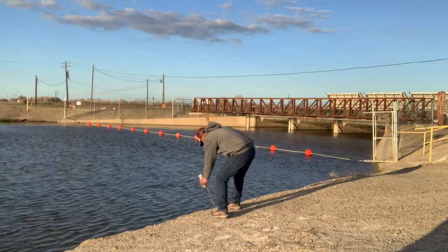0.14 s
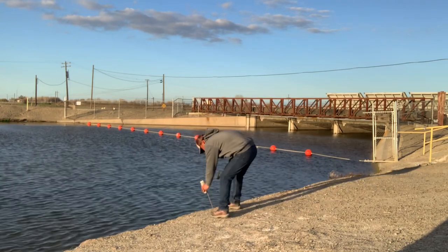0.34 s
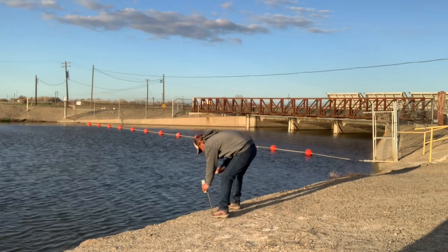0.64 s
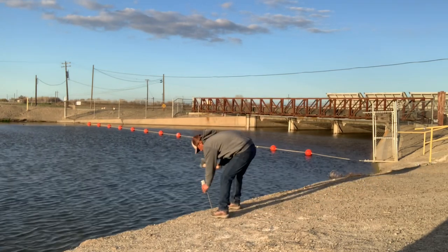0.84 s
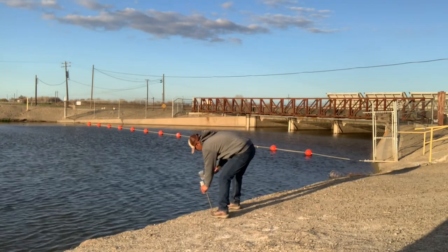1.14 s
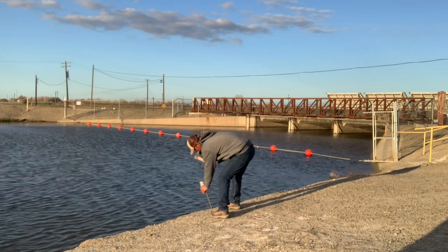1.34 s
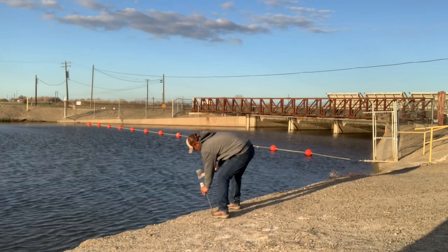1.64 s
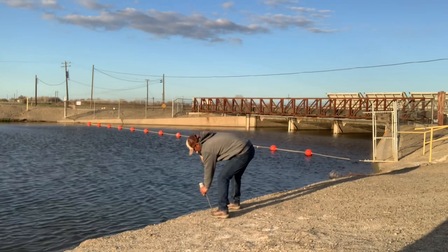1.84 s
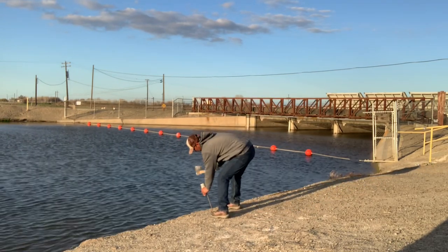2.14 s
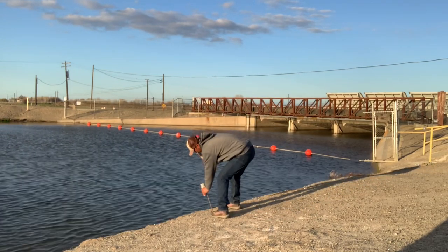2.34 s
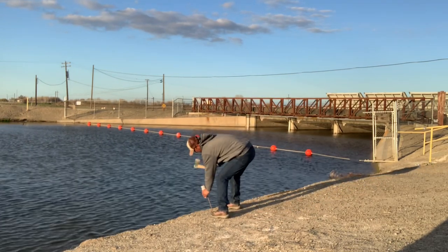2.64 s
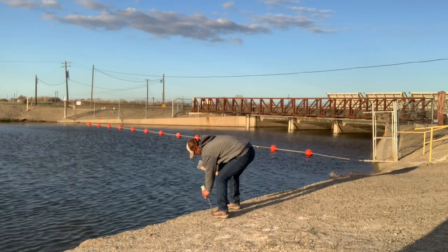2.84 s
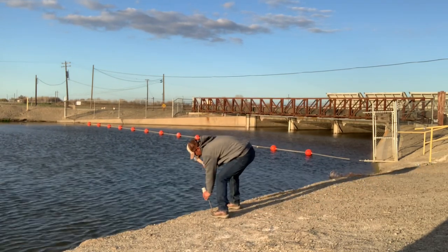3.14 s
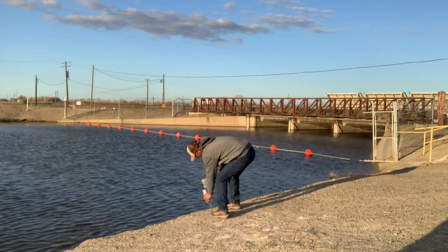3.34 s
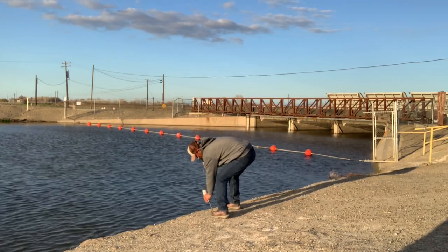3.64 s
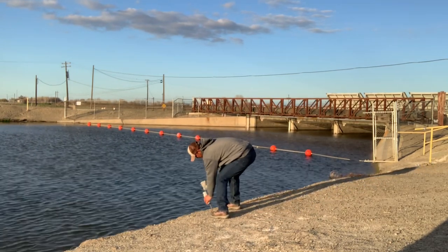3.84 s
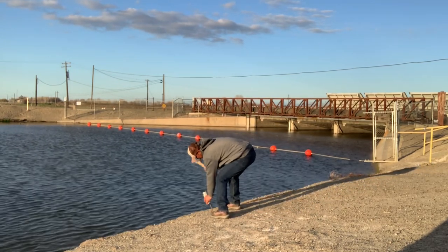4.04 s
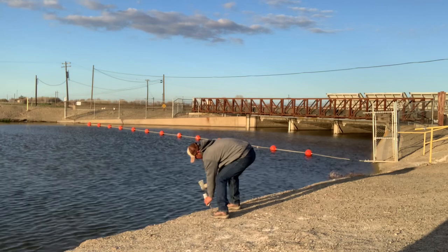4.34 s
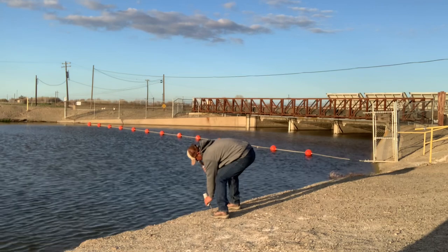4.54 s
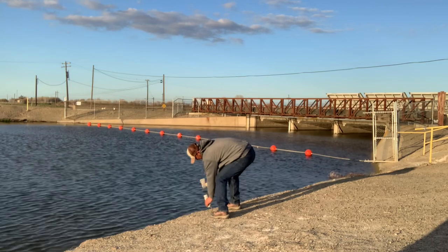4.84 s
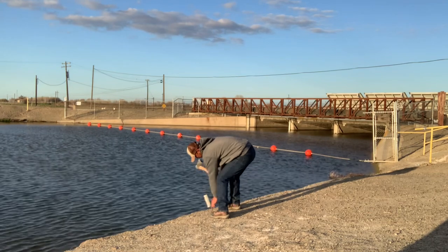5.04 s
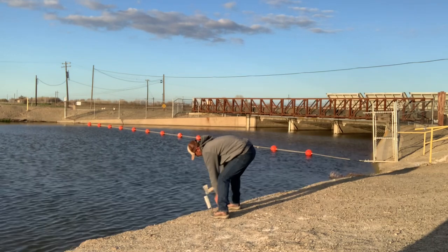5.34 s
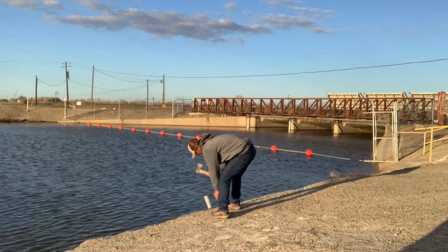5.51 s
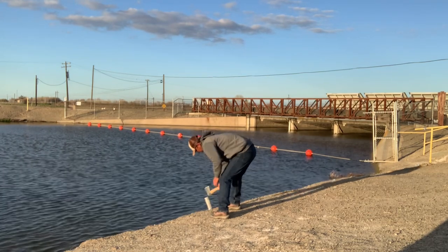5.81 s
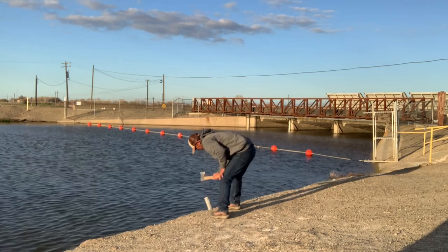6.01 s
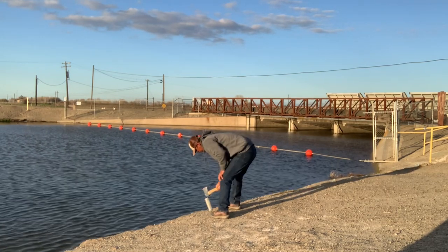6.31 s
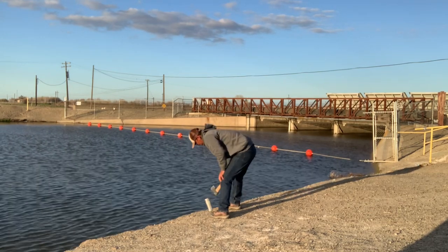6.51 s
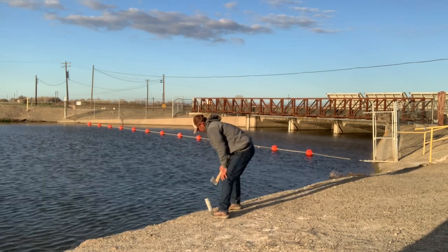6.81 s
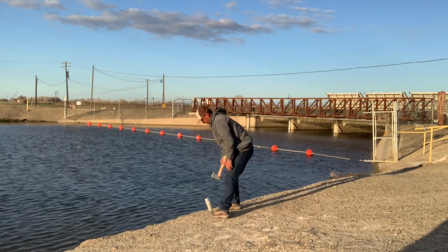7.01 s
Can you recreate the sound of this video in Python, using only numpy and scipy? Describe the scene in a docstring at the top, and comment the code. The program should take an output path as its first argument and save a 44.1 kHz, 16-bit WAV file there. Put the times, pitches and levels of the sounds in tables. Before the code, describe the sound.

Outdoors on a gravel bank by open water, small birds twitter and boots crunch faintly. After a second, a steel hammer starts hitting a wooden stake: twelve hard, bright cracks, slightly under half a second apart, slower at the end. Each has a short clicky ring and a faint scattered echo. Wind is mild at first, then thumps and pops on the nearby stereo microphone in the second half.

```python
"""A steel hammer drives a wooden stake into a gravel bank beside open water, metres from a two-port microphone.
Each blow is a noise crack plus ringing modes and a low thump, with a ground echo, bright slaps and scattered
noise returns from the near bank and from a bridge across the water.
Wind is banded noise with buffets, pops and ticks on the ports; small birds are gliding sines that also
return from the surroundings; boots crunch as noise grains; a faint open-air hiss lies under it all."""
import sys
import numpy as np
from scipy import signal
from scipy.fft import rfft, irfft
from scipy.io import wavfile
from scipy.ndimage import uniform_filter1d

SR = 44100
rng = np.random.default_rng(int(sys.argv[2]) if len(sys.argv) > 2 else 0)


def dump(signal):
    """Clip the signal to [-1, 1] and save it as 16-bit WAV at the path in sys.argv[1]."""
    limited = np.clip(np.atleast_2d(signal).T, -1, 1)
    pcm = np.round(limited * 32767).astype(np.int16)
    wavfile.write(sys.argv[1], SR, pcm)


N = 316175   # length [samples]

# Wind between the buffets: (time [s], relative level [dB], offset of the rasp above it [dB])
WIND = [(0, -27.5, -17), (.9, -32, -18), (1.4, -34, -13.5), (1.6, -39, -14), (2.1, -37, -15.5),
        (3.1, -36.5, -13.5), (3.5, -29, -9), (3.78, -34.5, -7), (3.95, -23, -6.5), (4.25, -37.5, -14.5),
        (4.5, -29, -6), (4.721, -33, -12), (5.001, -23.5, -9), (5.2, -32.5, -12), (5.8, -31.5, -7),
        (6.151, -32, -16), (6.45, -24.5, -10.5), (6.8, -31, -15), (7.17, -35, -19)]
# Wind spectrum: (frequency [Hz], relative density [dB per Hz], share of the rasp offset, flicker [dB])
WIND_BANDS = [(22.7, -19.5, .02, 3), (36.25, 1.5, .02, 2.5), (68, 10.5, 0.022, 1.5), (108, 6, .22, 4.5),
              (160.5, 5, .8, 5.5), (338, 0.5, 1.553, 6.5), (452, -7, 1.81, 5), (640, -14.5, 2.1, 7),
              (1380, -33.5, 2.15, 5)]
# Buffets, single thumps of air on the ports: (middle [s], length [s], relative level [dB])
BUFFETS = [(0.274, 0.02, -19.5), (0.772, 0.05, -24), (0.864, 0.075, -25), (2.598, 0.08, -35),
           (3.38, 0.13, -26.5), (3.547, 0.06, -23.5), (3.884, 0.055, -11), (4.434, 0.055, -19.5),
           (4.6, 0.048, -17), (4.959, 0.042, -18), (5.348, 0.025, -16), (5.447, 0.15, -21.5),
           (5.64, 0.13, -17), (5.814, 0.052, -24), (5.916, 0.11, -24.5), (6.083, 0.014, -19.5),
           (6.584, 0.119, -25.5), (6.706, 0.057, -17)]
RASP_PER_BUFFET_DB = 0.188   # dB of rasp for each dB a buffet stands above the wind
# Eddies reach the left port late; from a moment on, the lows sit in the middle
EDDY_LAG_S, CENTRED_FROM_S, CENTRED_BELOW_HZ = .0019, 5.08, 700
WIND_LIKENESS, RASP_LIKENESS = 0.63, 0.19   # left-right, in bands below and above the centred lows
# Open-air hiss: (frequency [Hz], relative density [dB per Hz])
AIR_SPECTRUM = [(700, 0), (1500, -3), (3000, -0.5), (5000, -8), (7500, -17.5), (9000, -27.5),
                (13000, -15.5), (16500, -22.5)]
AIR_DB = -68
# Bird notes: (time [s], length [s], start [Hz], end [Hz], arch on the glide [Hz], level [dB])
BIRD_NOTES = [(0.016, 0.022, 3850, 3450, 100, -57), (0.044, 0.055, 4200, 3850, 351, -53.5),
              (0.055, 0.03, 2420, 1950, 1, -60), (0.085, 0.045, 2100, 2100, 643, -68.5),
              (0.23, 0.05, 4260, 3800, 394.5, -55.5), (0.338, 0.065, 3050, 2600, 1091, -55.5),
              (0.404, 0.028, 3020, 3410.0, 94, -51), (0.44, 0.025, 3460, 3400, 546.5, -49),
              (0.52, 0.025, 3630, 3500, 407.5, -55.5), (0.57, 0.05, 3550, 3640.0, -110.0, -52.0),
              (0.604, 0.037, 4400.0, 4440.0, -160.0, -50), (0.668, 0.058, 3910, 3200, 492, -52.5),
              (0.74, 0.022, 3900, 3600, 100, -60), (0.77, 0.03, 2980, 2500, -2, -61),
              (0.778, 0.041, 4380, 3850.0, 194.5, -50), (0.822, 0.022, 3650, 3600, 901, -54),
              (0.845, 0.025, 2320, 2500, 201, -62), (0.86, 0.06, 4380, 3350, 505.5, -57.5),
              (0.95, 0.05, 3250, 2300, 301.5, -64.5), (1.236, 0.061, 3610, 3770.0, 20.0, -55),
              (1.265, 0.025, 3800, 3900, 698, -57.5), (1.284, 0.019, 3450.0, 3040.0, 69.5, -55),
              (1.324, 0.058, 3450, 3550, 150, -55.5), (1.363, 0.029, 3980.0, 4360.0, 247.5, -50.5),
              (1.638, 0.064, 2330.0, 2530.0, 396, -59.5), (1.782, 0.043, 4050.0, 3580.0, 281.5, -55.5),
              (1.824, 0.022, 4170.0, 4160.0, -3.5, -55.5), (2.3, 0.025, 3570, 4700, 201, -62.5),
              (2.316, 0.023, 3490.0, 3540.0, 126, -52), (2.443, 0.042, 3760, 3500, 697, -51),
              (2.535, 0.048, 4000, 3500, 648.5, -58), (2.595, 0.012, 3620, 4000, 803.5, -57),
              (2.616, 0.026, 4180, 4490.0, -120.0, -50), (2.648, 0.034, 4000, 3430.0, 58.5, -53.5),
              (2.695, 0.025, 4130, 3500, 100.5, -60), (2.756, 0.038, 3480, 3860.0, 170.0, -54),
              (2.793, 0.025, 4800, 3000, 4.5, -55.5), (2.999, 0.035, 3490.0, 3590.0, -63, -56.5),
              (3.035, 0.037, 3810, 4030.0, 204.5, -51), (3.09, 0.041, 3900, 3280.0, 281, -49.5),
              (3.193, 0.044, 3560, 3530.0, 66, -51.5), (3.346, 0.04, 4180.0, 3780.0, -170.0, -54.5),
              (3.454, 0.037, 2696, 2210.0, 92, -56.5), (3.654, 0.046, 3020, 2520.0, 123, -54),
              (3.837, 0.028, 2950.0, 2480.0, -25, -53), (3.922, 0.019, 2470, 2890.0, 69.5, -52),
              (3.976, 0.046, 3370, 3560.0, 143, -45), (4.027, 0.035, 2920.0, 2130.0, 92, -50),
              (4.293, 0.032, 4040.0, 3500.0, -160.0, -54.5), (4.365, 0.025, 3950.0, 3670.0, 56, -56.0),
              (4.376, 0.034, 4080.0, 4270.0, 216.5, -52.5), (4.56, 0.03, 4270, 3900, 800, -58),
              (4.587, 0.022, 2300, 2540.0, 32.5, -56), (4.93, 0.056, 3780, 4350, -120, -51.5),
              (5.008, 0.02, 3560, 3700, 697.5, -51), (5.127, 0.032, 3840, 3760.0, -61, -52.0),
              (5.163, 0.019, 4210.0, 4080.0, 223, -48.5), (5.336, 0.043, 3750, 3600, 239, -50.5),
              (5.501, 0.08, 2300, 2350, 499, -59), (5.62, 0.036, 3880, 3670, 299, -56),
              (5.805, 0.032, 2810, 2350, 75, -61), (5.85, 0.018, 3610, 3800, 548, -50.5),
              (5.87, 0.04, 3870, 4100, 4.5, -53.5), (5.942, 0.018, 3500, 3600, 848, -48),
              (5.955, 0.045, 3450, 3200, 449.5, -52), (5.995, 0.035, 2720, 2400, 148.5, -60),
              (6.05, 0.045, 4020, 3450, 9, -62.5), (6.105, 0.02, 3720, 3500, 250.5, -59),
              (6.155, 0.06, 3470, 2000, 499.5, -63), (6.203, 0.022, 3300, 3450, 246.5, -52.5),
              (6.362, 0.043, 3820.0, 4040.0, 233, -53), (6.426, 0.026, 3320.0, 3830.0, 113, -55),
              (6.47, 0.025, 3700, 3600, 995, -53), (6.497, 0.014, 3460, 4400, 3, -53.5)]
FAR_BIRDS_PER_S, FAR_BIRDS_DB, FAR_BIRDS_UNTIL_S = 70, -62, 6.6   # level of the loudest
# Boots on gravel: (time [s], relative level [dB], t60 [s], frequency that places the band [Hz])
STEPS = [(0.057, -53, 0.051, 5350), (0.254, -42, 0.044, 2050), (.718, -56, 0.037, 5500),
         (.825, -64, .04, 5190), (6.69, -42, 0.033, 1620), (6.927, -51.5, 0.08, 2640),
         (6.986, -51.5, 0.042, 4370)]
# Sudden pressure steps of eddies on the ports: (time [s], relative level [dB])
POPS = [(.601, -32.5), (3.497, -22), (3.846, -32.5), (3.889, -19), (4.425, -26.5), (4.518, -24.5),
        (4.837, -22), (4.898, -27.5), (4.944, -23), (4.978, -30.5), (5.265, -18.5), (5.333, -15.5),
        (5.455, -24), (5.597, -29.5), (5.624, -16), (5.669, -23), (5.806, -14), (5.912, -24.5),
        (6.006, -29.5), (6.373, -28), (6.428, -26.5), (6.485, -32.5), (6.698, -25)]
POP_HZ, POP_END_HZ, POP_FALL_S = 401.5, 95, 0.01   # glide scale and noise top, end pitch, time constant
POP_T60_S, POP_THUMP_DB, POP_RISE_S = .08, 4.5, 0.0056

# Blows; where the face lands sets how each part rings, in groups numbered without pitch order:
# (time [s], blow level [dB], wood [dB], ring group 1 [dB], ring group 2 [dB], ring group 3 [dB],
#  ring group 4 [dB], low thump at the moment of the blow, from ground or wind, independent of the
#  blow level [dB], ground echo delay [ms], ground echo level [dB])
BLOWS = [(1.018, -5.5, 4, -9.5, -5, -21, 1.5, -16, 4, -3.5),
         (1.467, -5, 2, 1.5, -21.5, -17, 0.5, -24.5, 3, -2),
         (1.499, -25.5, 4.5, 1.5, -7, -9, -9, -41.5, 4, -5.5),
         (1.938, -3, -2.5, 1, -6.5, -6.5, 2, -26.5, 3.5, -3),
         (2.3832, -5, 4.5, -12.5, 6.5, -1.5, -0.5, -19, 6.7, -5.5),
         (2.8228, -4.5, -2, -14, 8, 0, 7, -14.5, 7, -5.5),
         (3.2645, -5.5, -9, 4.5, -0.5, 1, -1.5, -21, 6, 1.5),
         (3.721, -5.5, -2.5, 0, 7, -3, 2, -17.5, 5.5, -4.5),
         (4.176, -6.5, -2.5, 0, 7, 1.5, -0.5, -7, 4.5, -0.5),
         (4.6301, -4, -12.5, -1, 4.5, -6.5, -4, -34.5, 4, -4),
         (5.227, -5, -8.5, 6, -2.5, 6, 1, -36, 5, -0.5), (5.713, -3, -10.5, -1, -10, 9.5, 1.5, -5, 5.5, -7),
         (6.253, -4.5, -2, 4.5, -8, 6, 4.5, -28.5, 4, -8.5)]
# Modes of stake and hammer head: (frequency [Hz], level before that of the blow and part [dB], t60 [s], part)
# The rounded part picks wood (0) or ring group 1-4; below zero it counts back from the last group
MODES = [(1050, -24.5, 0.018, 1.5), (1298, -32, 0.057, 0), (1620, -27.5, 0.0053, -0.5),
         (2240, -16, 0.011, -1.5), (3324, -9, 0.017, 1), (3520, -9.5, 0.022, 2.5), (5300, -8.5, 0.018, 2),
         (3590, -20, 0.075, 0), (14830, -30, .05, 4), (6358, -15.5, 0.022, 2), (7500, -19, 0.0083, 2.5),
         (8780, -5.5, 0.013, 4), (10780, -13.5, 0.0089, 4), (12150, -15.5, 0.0092, 4),
         (15100, -5.5, 0.0086, 4)]
WOOD_DETUNE, DETUNE, UNEVEN_DB = .04, .006, 1.5   # spread from blow to blow; detunings are fractions
# Spectrum of the crack: (frequency [Hz], relative density [dB per Hz])
CRACK_SPECTRUM = [(500, -5), (1000, -3.5), (3000, 4.5), (6000, 6), (10000, 3.5), (14000, 0), (16500, -6)]
CRACK_DB, CRACK_T60_S, CONTACT_T60_S, RISE_T60_S = -6, 0.025, 0.0028, 0.0031
GROUND_CUT_HZ = 22000
THUMP_HZ, THUMP_T60_S = 89, 0.017
# Phase between the ports for sound from the stake: (frequency [Hz], lead of the left port [radians])
PORT_PHASE = [(300, .6), (1500, .8), (2200, -1), (3700, .1), (4000, -1.9), (4850, -2.2), (5400, -.9),
              (5900, -1.1), (6100, -3.8), (6700, -5.4), (7100, -3.3), (9300, -3), (11000, -1.8),
              (13000, -.5), (16500, 1.4)]
# Flat walls throw back one clean copy each: (delay after the blow [s], level [dB])
SLAPS = [(0.0713, -36.5), (.092, -51.5)]
# Band of those copies: (low edge [Hz], high edge [Hz])
SLAP_BAND_HZ = [3700, 11000]

# Scattered return, levels before its colour: the near bank answers at once and dies,
# the far bridge holds, then fades
BANK_DB, BANK_RISE_T60_S, BANK_T60_S = -40.5, 0.0095, 0.099
SHORE_DB, SHORE_T60_S = -64, 0.46
BRIDGE_DB, BRIDGE_HOLD_S, BRIDGE_FADE_S = -76.5, 0.29, 0.067
BRIDGE_TAIL_DB, BRIDGE_T60_S = -74, 0.4
RETURN_S, FAR_CUT_HZ, RETURN_LIKENESS, RETURN_GRAIN_DB = .6, 6800, 0.15, 2.5
RINGS_RETURN_DB, SONG_RETURN_DB = -17, 0
# Colour of the return: (frequency [Hz], gain [dB])
RETURN_COLOUR = [(700, -1), (1400, 6.5), (2300, -2.5), (4000, 4.5), (6900, -5.5), (9000, -11),
                 (10500, -3.5)]
# Thin bright ticks inside the gusts: (time [s], relative level [dB])
TICKS = [(3.849, -33), (3.886, -24), (4.018, -37.5), (4.036, -41.5), (4.073, -35.5), (4.448, -29),
         (4.586, -32), (4.937, -45), (5.031, -43), (5.047, -37), (6.696, -36)]
# Band of the ticks: (low edge [Hz], high edge [Hz])
TICK_BAND_HZ = [450, 1400]
TICK_T60_S = .022

RUMBLE_CUT_HZ, CUTOFF_HZ = 26, 17000   # microphone floor, top cut
SIDES = np.array([[1], [-1]])   # left port, right port


def amp(db):
    """Decibels become an amplitude factor."""
    return 10 ** (np.asarray(db) / 20)


def rms_one(x):
    """Scale a signal to rms 1."""
    return x / np.sqrt(np.mean(x ** 2) + 1e-20)


def at_hz(points, hz):
    """Every column of a table, read on a log-frequency axis."""
    known, *columns = np.transpose(points)
    return [np.interp(np.log(hz + 1e-9), np.log(known), c) for c in columns]


def coloured(x, points):
    """A signal shaped by a spectrum; rms 1."""
    gain = amp(at_hz(points, np.fft.rfftfreq(N, 1 / SR))[0])
    return rms_one(irfft(rfft(x) * gain, N))


def drift(rate):
    """Chance smoothed by two poles at a rate in Hz; rms 1."""
    r = np.exp(-2 * np.pi * rate / SR)
    noise = rng.standard_normal(N + SR)
    return rms_one(signal.lfilter([1], [1, -2 * r, r * r], noise)[SR:])   # drops the run-in


def clicks(times, sizes):
    """Single samples of given sizes at given times in seconds."""
    out = np.full(N, 1e-18)   # a tiny floor keeps the filters fast
    out[(np.asarray(times) * SR).astype(int)] = sizes
    return out


def ring(x, hz, t60):
    """A unit click sets a decaying sine of height 1 ringing."""
    r, w = amp(-60 / (t60 * SR)), 2 * np.pi * hz / SR
    return signal.lfilter([0, np.sin(w)], [1, -2 * r * np.cos(w), r * r], x)


def dying(x, t60):
    """A click becomes a falling envelope."""
    return signal.lfilter([1], [1, -amp(-60 / (t60 * SR))], x)


def swelling(x, rise_t60, t60):
    """A click becomes an envelope that rises quickly, then falls."""
    return dying(x, t60) - dying(x, rise_t60)


def bandpass(x, order, edges):
    """Keep the band between two edges in Hz."""
    return signal.sosfilt(signal.butter(order, edges, "band", fs=SR, output="sos"), x)


def gusting():
    """Level and rasp of the wind: a slow course with bell-shaped buffets on top."""
    s, calm_db, rasp_db = np.transpose(WIND)
    t = np.arange(0, N, 32) / SR
    calm_db = np.interp(t, s, calm_db)
    power = amp(2 * calm_db)
    for middle, length, db in BUFFETS:
        power = power + amp(2 * db) * np.exp(-(2 * (t - middle) / length) ** 2 * 2)
    level_db = 10 * np.log10(power)
    rasp_db = np.interp(t, s, rasp_db) + RASP_PER_BUFFET_DB * (level_db - calm_db)
    return [np.interp(np.arange(N) / SR, t, c) for c in (level_db, rasp_db)]


def across_ports(mid, side, alike, centred=True):
    """Air noise partly own in each port and late at the left one; if centred, it later moves to the middle."""
    alike = np.clip(alike, 0, 1)
    pair = np.sqrt((1 + alike) / 2) * mid + np.sqrt((1 - alike) / 2) * side * SIDES
    pair[0] = np.roll(pair[0], round(EDDY_LAG_S * SR))
    to_middle = np.clip((np.arange(N) / SR - CENTRED_FROM_S) * 10, 0, 1)
    return pair + centred * to_middle * (mid - pair)


def wind():
    """Half-octave bands of lumpy noise; eddies flicker through all bands at once, by band-dependent depths."""
    level_db, rasp_db = gusting()
    lumps, eddies = drift(17), drift(18)
    flicker = np.clip(eddies + 0.5 * lumps, None, 1.5)
    white = rng.standard_normal((2, 2, N))   # neighbouring bands use different noise
    edges, out = 20 * 2 ** np.arange(0, 6.6, .5), 0
    for k, (low, high) in enumerate(zip(edges, edges[1:])):
        mid, side = bandpass(white[k % 2], 3, [low, high])
        db, share, flicker_db = at_hz(WIND_BANDS, np.sqrt(low * high))
        gain = amp(level_db + db + share * rasp_db + flicker_db * flicker + 16.5)
        is_low = high < CENTRED_BELOW_HZ
        alike = WIND_LIKENESS if is_low else RASP_LIKENESS
        out = out + across_ports(gain * mid, gain * side, alike, is_low)
    return out


def open_air():
    """Steady coloured hiss whose level drifts slightly, own in each port."""
    return amp(AIR_DB + 1.5 * drift(8)) * coloured(rng.standard_normal((2, N)), AIR_SPECTRUM)


def far_flock():
    """Distant birds: fainter, steeper notes at random, with the columns of the near ones."""
    draw = rng.random((round(FAR_BIRDS_PER_S * FAR_BIRDS_UNTIL_S), 6))
    time, length = FAR_BIRDS_UNTIL_S * draw[:, 0], .01 + .018 * draw[:, 1]
    start_hz = 2500 + 2000 * np.sqrt(draw[:, 2])
    end_hz = start_hz + 1400 * (draw[:, 3] - .65)
    arch_hz = 600 * (draw[:, 4] - .25)
    return np.column_stack([time, length, start_hz, end_hz, arch_hz, FAR_BIRDS_DB - 10 * draw[:, 5]])


def birds():
    """Near and distant notes: sines on arched glides, each leading in phase at one port."""
    notes, out = [*far_flock(), *BIRD_NOTES], np.zeros((2, N))
    turn = rng.random((len(notes), 2))
    leads = (.4 + .6 * turn[:, 0]) * np.sign(turn[:, 1] - .5)   # radians each port is turned
    for (s, length, start, end, arch, db), lead in zip(notes, leads):
        u = np.linspace(0, 1, round(length * SR))
        glide = start + (end - start) * u + 4 * arch * u * (1 - u)
        phase = 2 * np.pi * np.cumsum(glide) / SR
        i = max(round(s * SR), 0)
        out[:, i:i + len(u)] += amp(db) * np.sin(np.pi * u) ** .3 * np.sin(phase + lead * SIDES)
    return out


def surroundings(x):
    """Countless small reflections as decaying noise; the far ones are dulled by the air."""
    t = np.arange(round(RETURN_S * SR)) / SR
    mid, side = rng.standard_normal((2, 2, len(t)))
    alike = np.clip(RETURN_LIKENESS, -1, 1)
    near, far = [np.sqrt(1 + alike) * m + np.sqrt(1 - alike) * d * SIDES for m, d in zip(mid, side)]
    far = signal.sosfilt(signal.butter(8, FAR_CUT_HZ, fs=SR, output="sos"), far)
    bank = amp(BANK_DB - 60 * t / BANK_T60_S) * (1 - amp(-60 * t / BANK_RISE_T60_S))
    shore = amp(SHORE_DB - 60 * t / SHORE_T60_S)
    held = np.clip((BRIDGE_HOLD_S + BRIDGE_FADE_S - t) / BRIDGE_FADE_S, 0, 1)
    bridge = amp(BRIDGE_DB) * held + amp(BRIDGE_TAIL_DB - 60 * t / BRIDGE_T60_S)
    lumps = uniform_filter1d(rng.standard_normal(len(t)), size=260)   # banks and posts answer unevenly
    answer = (near * (bank + shore) + far * bridge) * amp(RETURN_GRAIN_DB * rms_one(lumps))
    colour = amp(at_hz(RETURN_COLOUR, np.fft.rfftfreq(len(t), 1 / SR))[0])
    answer = irfft(rfft(answer) * colour, len(t))
    return signal.fftconvolve(x, answer, axes=1)[:, :N]


def boots():
    """Stones snap against each other in a short crunch: sparse noise grains in a band."""
    grains, out = rng.standard_normal((2, N)) * (rng.random(N) < .2), 0
    for s, db, t60, hz in STEPS:
        crunch = 5 * dying(clicks([s], amp(db)), t60) * grains
        out = out + bandpass(crunch, 2, [hz / 1.56, hz * 1.09])
    return out


def pops():
    """A thump whose pitch drops quickly, inside a short burst of dull turbulence."""
    s, db = np.transpose(POPS)
    puff = swelling(clicks(s + 0.00083, amp(db)), .0079, 0.036)
    mid, side = 12 * bandpass(puff * rng.standard_normal((2, N)), 3, [90, POP_HZ])
    t = np.arange(SR // 12) / SR
    envelope = amp(-60 * t / POP_T60_S) * np.sin(np.pi / 2 * np.minimum(t / POP_RISE_S, 1)) ** 2
    for start, size, (high, turn) in zip(s, amp(db + POP_THUMP_DB), rng.random((len(s), 2))):
        hz = POP_END_HZ + POP_HZ * (.8 + .6 * high) * np.exp(-t / POP_FALL_S)
        thump = envelope * np.sin(2 * np.pi * np.cumsum(hz) / SR)
        i = round(start * SR)
        mid[i:i + len(t)] += size * np.sign(turn - .5) * thump   # random polarity
    return across_ports(mid, side, 0.6)


def hammer():
    """Steel chatters on wood, rings every mode a little differently, cracks, and comes again off the ground."""
    crack, chatter = coloured(rng.standard_normal(N), CRACK_SPECTRUM), rng.standard_normal(N)
    chance = rng.standard_normal((len(BLOWS), 2, len(MODES)))
    out, t = np.zeros((2, N)), np.arange(SR // 5)   # rows: crack, rings
    click = 1e-18 + (t == 0)
    contact = swelling(click, CONTACT_T60_S / 2, CONTACT_T60_S)
    ground = signal.butter(1, GROUND_CUT_HZ, fs=SR, output="sos")
    for (s, blow_db, *parts_db, _, echo_ms, echo_db), (detune, uneven) in zip(BLOWS, chance):
        i, lag = round(s * SR), round(echo_ms * SR / 1000)
        blow = np.zeros((2, len(t)))
        blow[0] = amp(CRACK_DB) * swelling(click, RISE_T60_S, CRACK_T60_S) * crack[i + t]
        for k, (hz, db, t60, part) in enumerate(MODES):
            hz = hz * (1 + (DETUNE if part else WOOD_DETUNE) * detune[k])   # wide only for part exactly 0
            # a steady push at the mode's pitch builds the ring up; the chatter roughens it
            push = .33 * np.sin(2 * np.pi * hz * t / SR) + .12 * chatter[i + t + 1000 * k]
            size = amp(db + parts_db[round(part)] + UNEVEN_DB * uneven[k])
            blow[1] += ring(size * contact * push, hz, t60)
        blow[:, lag:] += amp(echo_db) * signal.sosfilt(ground, blow[:, :-lag])
        out[:, i + t] += amp(blow_db) * blow
    return out


def low_thumps():
    """A low thump at the moment of each blow, from ground or wind: a soft push that rings briefly."""
    s, thump_db = np.transpose(BLOWS)[[0, 7]]
    push = dying(clicks(s + 0.0013, amp(thump_db)), 0.0068) / (0.00066 * SR)
    return ring(push, THUMP_HZ, THUMP_T60_S)


def at_ports(x):
    """The housing turns the phase of one port against the other."""
    half = at_hz(PORT_PHASE, np.fft.rfftfreq(N, 1 / SR))[0] / 2
    return irfft(rfft(x) * np.exp(1j * half * SIDES), N)


def slaps(x):
    """A few bright, delayed copies of each blow."""
    x = bandpass(x, 1, SLAP_BAND_HZ)
    return sum(amp(db) * np.roll(x, round(delay * SR), axis=1) for delay, db in SLAPS)


def broad_snap(crack):
    """Rough banks scatter the crack as one broad snap: a coloured click per blow."""
    s, blow_db = np.transpose(BLOWS)[:2]
    return crack.std() * coloured(clicks(s, amp(blow_db)), CRACK_SPECTRUM)


def ticks():
    """Very short bursts of brighter turbulence, own in each port."""
    s, db = np.transpose(TICKS)
    puff = 5 * dying(clicks(s, amp(db)), TICK_T60_S) * rng.standard_normal((2, N))
    return bandpass(puff, 3, TICK_BAND_HZ)


def scene():
    """All sources and their returns, summed at the two ports."""
    song = birds()
    crack, rings = hammer()
    blows = at_ports(crack + rings)
    # the narrow rings scatter less than the snap
    scattered = at_ports(broad_snap(crack) + amp(RINGS_RETURN_DB) * rings)
    echoes = surroundings(scattered + amp(SONG_RETURN_DB) * song)
    struck = blows + slaps(blows) + low_thumps()
    return struck + echoes + wind() + pops() + ticks() + song + boots() + open_air()


def record(dry):
    """The microphone drops the deepest rumble and rounds the peaks; the top is cut."""
    x = signal.sosfilt(signal.butter(2, RUMBLE_CUT_HZ, "high", fs=SR, output="sos"), dry)
    rounded = .88 * np.tanh(x / .88)
    return signal.sosfilt(signal.cheby2(12, 70, CUTOFF_HZ, fs=SR, output="sos"), rounded)


dry = scene()
out = record(dry)
dump(out)
```